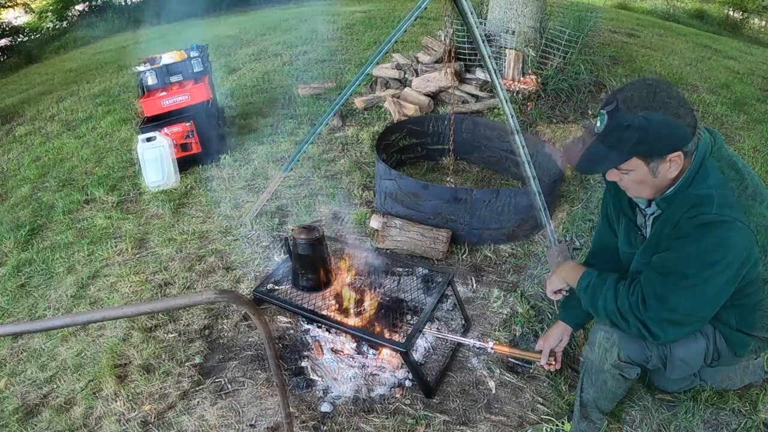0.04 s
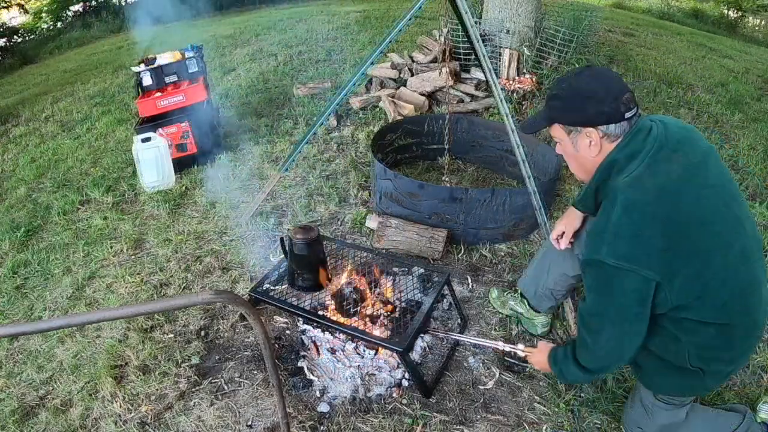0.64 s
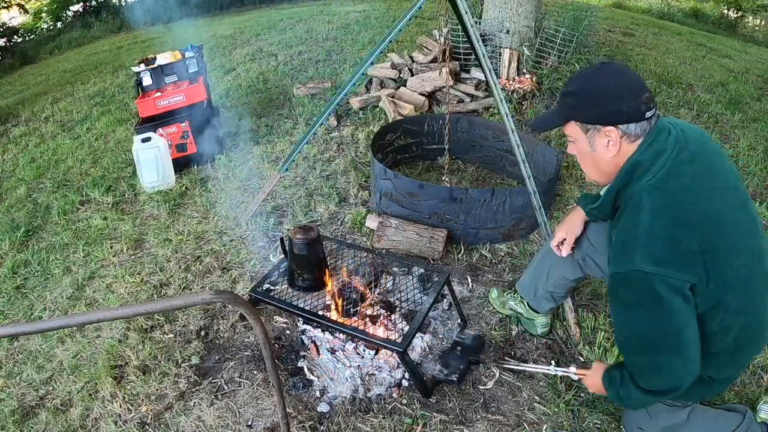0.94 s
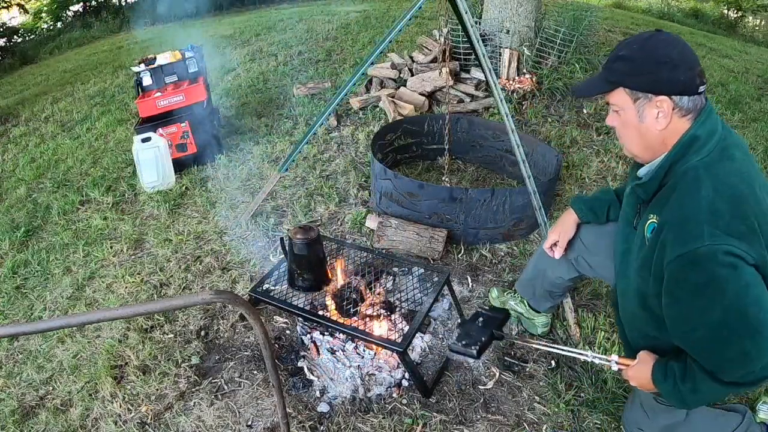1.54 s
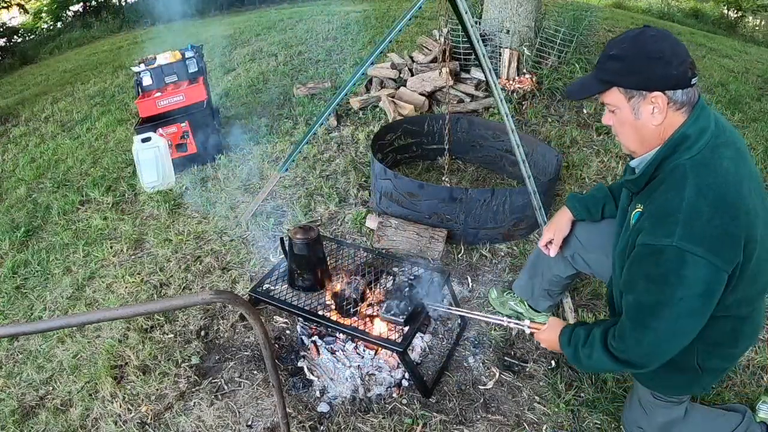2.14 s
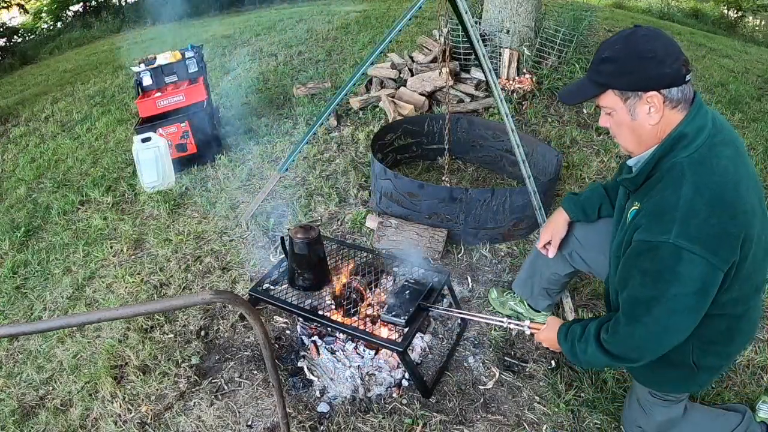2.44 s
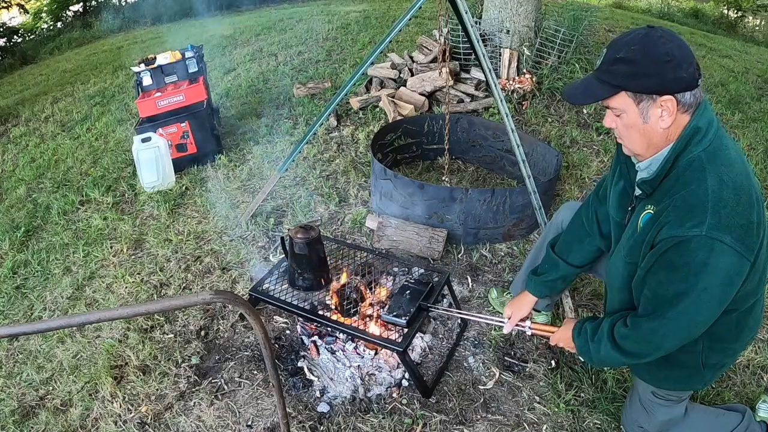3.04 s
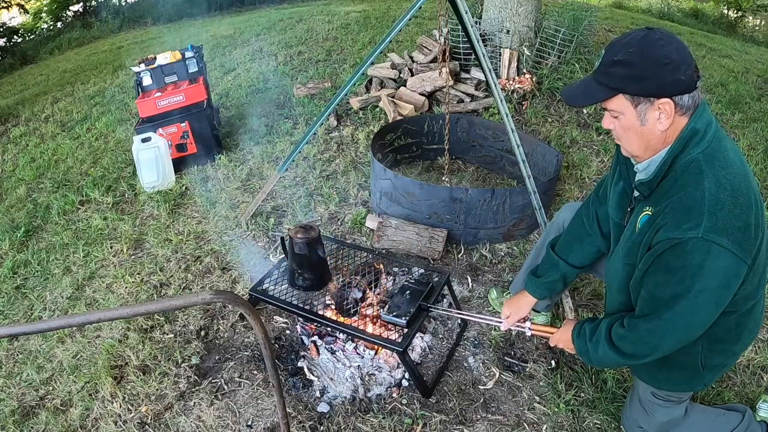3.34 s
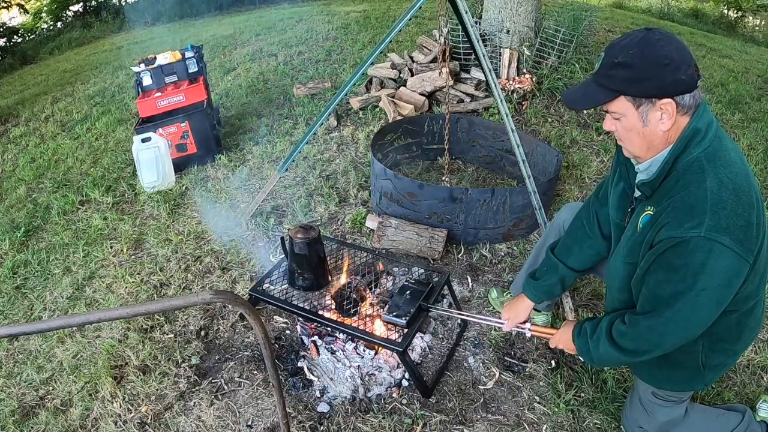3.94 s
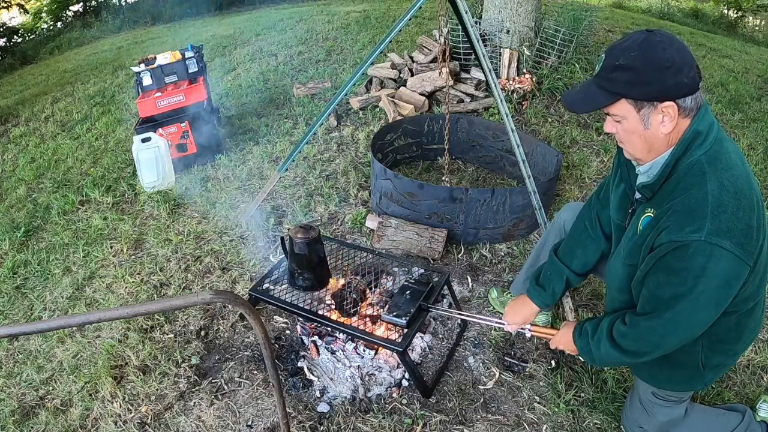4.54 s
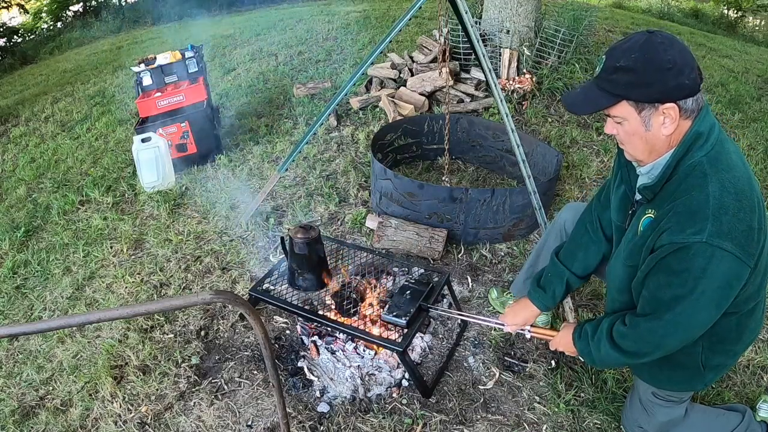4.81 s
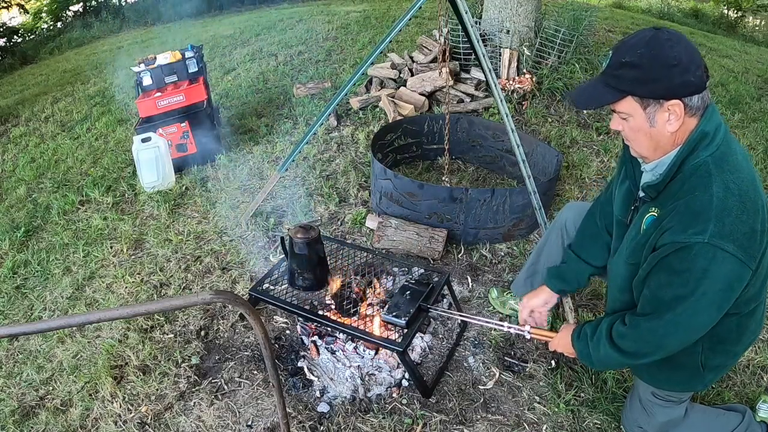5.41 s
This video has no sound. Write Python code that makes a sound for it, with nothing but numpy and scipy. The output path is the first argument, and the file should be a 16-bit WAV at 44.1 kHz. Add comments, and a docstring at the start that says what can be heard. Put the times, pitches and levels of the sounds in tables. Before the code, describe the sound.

Two short bursts of iron clanking on a steel grill over a quietly snapping campfire, with soft crickets and distant bird whistles.

```python
"""A long-handled cast-iron cooker is set down on a steel grate, rocks, and later knocks once more:
iron and grate ring, the mesh rattles, the frame thuds and the handle rods clack together.
Under it a campfire snaps with bursting gas and flutters in the breeze, and the cook's clothes rustle.
Crickets trill with their wings and a bird whistles arched notes from the trees around the lawn.
A noisy echo trails the knocks; a gain control dips the mix a little after each loud knock or snap."""
import sys
import numpy as np
from scipy import signal
from scipy.fft import rfft, irfft, next_fast_len
from scipy.io import wavfile

SR = 44100
rng = np.random.default_rng(int(sys.argv[2]) if len(sys.argv) > 2 else 0)


def unload_wav(signal):
    """Save mono or channel-first audio to the path in sys.argv[1] as 16-bit WAV at rate SR, clipped to [-1, 1]."""
    wavfile.write(
        sys.argv[1],
        SR,
        np.round(np.clip(np.atleast_2d(signal).T, -1, 1) * 32767).astype(np.int16),
    )


N = 250047
T = np.arange(N) / SR

# Stereo image of the open air. Each row: frequency in Hz, left-right likeness from 0 to 1.
AIR_LIKENESS = [(60, 0.92), (130, 0.99), (290, 0.52), (640, 0.54), (1400, 0.47), (3100, 0.57), (7000, 0.23),
                (15000, 0.13)]


def amp(db):
    """Decibels to amplitude."""
    return 10 ** (np.asarray(db) / 20)


def unit_rms(x):
    """Scales to an rms of 1."""
    return x / np.sqrt(np.mean(x ** 2) + 1e-20)


def curve_at(points, hz):
    """Reads a curve on a log-frequency axis."""
    point_hz, value = np.transpose(points)
    return np.interp(np.log(hz + 1), np.log(point_hz + 1), value)


def add(mix, start_s, sound):
    """Mixes a sound in at its start time."""
    part = mix[..., max(round(start_s * SR), 0):][..., :sound.shape[-1]]
    part += sound[..., :part.shape[-1]]


def hump(hz, centre_hz, octaves, depth_db):
    """A broad bell EQ, in dB relative to its top."""
    return depth_db * (np.exp(-.5 * (np.log2((hz + 1) / centre_hz) / octaves) ** 2) - 1)


def drift(rate_hz, size=N):
    """A smooth random wander with an rms of about 1."""
    lowpass = np.exp(-(np.fft.rfftfreq(N, 1 / SR) / rate_hz) ** 2)
    return unit_rms(irfft(rfft(rng.standard_normal(N)) * lowpass, N))[:size]


def noise(colour, likeness=AIR_LIKENESS, size=N, lag_s=2.6e-5):
    """Stereo noise whose colour maps Hz to dB; the left side lags slightly."""
    count = next_fast_len(size)
    hz = np.fft.rfftfreq(count, 1 / SR)
    common, separate = np.exp(2j * np.pi * rng.random((2, len(hz))))
    share = np.clip(curve_at(likeness, hz), 0, 1)
    left = common * np.exp(-2j * np.pi * hz * lag_s)
    right = share * common + np.sqrt(1 - share ** 2) * separate
    return unit_rms(irfft(np.array([left, right]) * amp(colour(hz)), count)[:, :size])


def scatter(x, t60, delay_s, rise_s, top_hz):
    """Darkened echoes off many surfaces build up after a delay and die away."""
    late = np.maximum(np.arange(SR) / SR - delay_s, 0)
    tail = noise(lambda hz: -10 * np.log10(1 + (hz / top_hz) ** 4), size=SR)
    tail = tail * (1 - np.exp(-late / rise_s)) * amp(-60 * late / t60)
    return signal.fftconvolve(x, tail / np.linalg.norm(tail[0]), axes=1)[:, :N]


def swells(rows, octaves, grain_db):
    """Short, grainy swells of noise, each in its own band."""
    out = np.zeros((2, N))
    for middle_s, db, centre_hz, length_s in rows:
        size = int(length_s * SR)
        band = noise(lambda hz: hump(hz, centre_hz, octaves, depth_db=55), size=2 * SR)[:, :size]
        envelope = amp(db + grain_db * drift(50, size)) * np.hanning(size)
        add(out, middle_s - length_s / 2, envelope * unit_rms(band))
    return out


def outdoors():
    """The bed: a lumpy flutter of flames and breeze under a soft hiss."""
    # Spectra of the flutter and the hiss. Each row: frequency in Hz, level in dB.
    flutter_eq = [(15, -11), (30, -10.5), (60, -1), (105, -1.5), (138, 4.5), (200, -1.5), (280, -12.5),
                  (420, -20), (900, -30)]
    hiss_eq = [(100, 4), (300, 5.5), (600, -2), (1200, 5), (2500, 1), (4500, 3.5), (8000, 0),
               (11000, -10.5), (16000, -21)]
    flutter = amp(-59.5) * noise(lambda hz: curve_at(flutter_eq, hz)) * amp(1.9 * drift(12))
    hiss = amp(-66) * noise(lambda hz: curve_at(hiss_eq, hz)) * amp(0.71 * drift(37))
    return flutter + hiss


def gusts(length_s=.11):
    """Flame and breeze buffet the microphone in low puffs."""
    # Each row: middle in seconds, level in dB, band centre in Hz.
    puffs = [(.3, -52.5, 78.5), (.76, -52.5, 96), (0.928, -65.5, 106), (1.169, -55.5, 60), (1.6, -53, 94),
             (2.55, -53, 67), (3.591, -55, 45.3), (3.93, -51.5, 62), (4.339, -65, 143), (4.991, -52, 85.5)]
    return swells([(s, db, hz, length_s) for s, db, hz in puffs], octaves=1.92, grain_db=1.1)


def crickets():
    """Far crickets blur into a band; the nearest pulse with each stroke of the wings."""
    # The far chorus. Each row: frequency in Hz, level in dB.
    chorus_eq = [(3800, -50), (4500, -16.5), (4850, -6), (5150, -3.5), (5450, -1.5), (5750, -0.5),
                 (6050, 0.5), (6500, -4.5), (7200, -11.5), (7700, -22.5), (8300, -47)]
    # Each row: pitch in Hz, level in dB, wing strokes a second.
    near_crickets = [(5790, -63, 30), (6040, -69, 36), (5720, -69, 150), (6130, -75.5, 76)]
    out = amp(-54) * noise(lambda hz: curve_at(chorus_eq, hz), lag_s=1e-5) * amp(0.75 * drift(90))
    for hz, db, rate in near_crickets:
        stroke = np.cumsum(rate * (1 + 0.0253 * drift(4.1))) / SR % 1
        tooth_hz = hz * (1 - 0.02 * (stroke - .5) + 0.00586 * drift(121))  # the wing slows in a stroke
        tone = np.exp(2j * np.pi * np.cumsum(tooth_hz) / SR)
        left = np.sin(np.pi * stroke) ** 2 * tone * amp(1.1 * drift(4.8))
        right = left * np.exp(1j * drift(21))  # wandering phase widens the image
        out += amp(db) * unit_rms(np.array([left.real, right.real]))
    return out


def insect(fade_db_per_s=42):
    """A high insect buzz swells in and out."""
    # The buzz's spectrum. Each row: frequency in Hz, level in dB.
    buzz_eq = [(7500, -45), (8500, -4.5), (9300, -1.5), (10100, -14.5), (11500, -23)]
    # Each row: crest of a swell in seconds, level in dB.
    buzzes = [(.34, -68.5), (1.8, -73), (4.55, -64.5)]
    envelope = sum(amp(db - fade_db_per_s * abs(T - s)) for s, db in buzzes)
    return envelope * noise(lambda hz: curve_at(buzz_eq, hz))


def whistle(contour, notes, waver):
    """A pure tone slides along a note's contour, a little differently each time."""
    out = np.zeros(N)
    when, pitch_hz, level_db = np.transpose(contour)
    t = np.arange(0, when[-1], 1 / SR)
    for start_s, db in notes:
        hz = np.interp(t, when, pitch_hz) * (1 + waver * drift(170, len(t)))
        envelope = amp(db + np.interp(t, when, level_db) + 2.9 * drift(70, len(t)))
        envelope *= signal.windows.tukey(len(t), .1)
        add(out, start_s, envelope * np.sin(2 * np.pi * np.cumsum(hz) / SR))
    return np.array([out, out])


def bird(flick_delay_s=.19):
    """Whistled arches, each long one answered by a high flick; the leaves scatter the flicks most."""
    # Note contours. Each row: seconds into the note, pitch in Hz, relative level in dB.
    long_arch = [(0, 1750, -11), (.025, 1950, -7), (.04, 2110, -15), (.055, 2210, 1), (.095, 2433, -5),
                 (.115, 2235, -0.5), (.135, 1890, -6), (.152, 1770, -3.5), (.168, 1780, -8)]
    short_arch = [(0, 1700, 3.5), (.02, 1880, 6.5), (.033, 2107, -7), (.047, 2180, 5), (.062, 1876, 1.5),
                  (.078, 1637, 1), (.092, 1500, 0)]
    flick = [(0, 3203, 3.5), (.03, 3275, -10.5), (.05, 3330, -15), (.06, 3547, 3), (.09, 3700, -5),
             (.12, 3640, -28)]
    # The song. Each row: start in seconds, relative level in dB.
    long_notes = [(3.54, -64.5), (4.097, -54), (4.482, -49), (4.838, -46.5)]
    short_notes = [(5.217, -55.5), (5.513, -57.5)]
    flick_notes = [(s + flick_delay_s, -38 + 0.39 * db) for s, db in long_notes]
    low = whistle(long_arch, long_notes, waver=.014) + whistle(short_arch, short_notes, waver=.011)
    high = whistle(flick, flick_notes, waver=.024)
    send = amp(-7) * low + amp(-0.5) * high
    leaves = scatter(send, t60=0.57, delay_s=0.005, rise_s=0.0087, top_hz=7360)
    return amp(-3.5) * low + amp(-11) * high + leaves


def rustles():
    """Soft rustles of clothes and handles."""
    # Each row: middle in seconds, level in dB, band centre in Hz, length in seconds.
    washes = [(.581, -61.5, 4300, 0.32), (.871, -68, 520, .55), (1.05, -67, 2180, 1.1),
              (1.6, -68.5, 2000, 0.46), (2.444, -56.5, 8000, 0.082), (2.72, -61, 2350, .65),
              (3.021, -54.5, 212, 0.11), (3.15, -72, 544, .65), (4.981, -68.5, 460, 0.18),
              (5.18, -50, 5030, 0.19), (5.22, -62, 583, 0.32), (5.46, -54, 3730, 0.22)]
    return swells(washes, octaves=1.69, grain_db=2.0)


def click(colour, size):
    """A sharp minimum-phase pulse of energy 1, one sample later on the left."""
    log_gain = np.log(amp(colour(abs(np.fft.fftfreq(size, 1 / SR)))))
    pulse = np.fft.ifft(np.exp(signal.hilbert(log_gain).conj())).real
    return np.array([np.roll(pulse, 1), pulse]) / np.linalg.norm(pulse)


def fire(fizz_t60=0.024):
    """Gas pockets burst in the wood, a crack and a fizz each: clear snaps among faint ticks."""
    # Each row: start in seconds, crack level in dB, band centre in Hz.
    snaps = [(0.0715, -6.5, 3830), (.624, -37, 3400), (1.483, -46, 9000), (1.504, -47, 2500),
             (1.833, -43, 9000), (2.0644, -27.5, 7740), (3.621, -26.5, 6500), (3.723, -37, 6500),
             (3.863, -36.5, 3700), (5.323, -29, 3610)]
    # The spectrum of snapping wood. Each row: frequency in Hz, level in dB.
    wood_eq = [(150, -20), (650, -4), (1300, 2.5), (1900, -15), (2300, -12), (2900, -2), (4100, 0.5),
               (6500, -0.5), (8200, -7.5), (10000, -7), (16000, -33)]
    ticks = [(when * N / SR, -63 + 14 * size ** 2, 2500 + 5000 * pitch)
             for when, size, pitch in rng.random((24, 3))]
    out, t = np.zeros((2, N)), np.arange(4096) / SR
    for start_s, db, centre_hz in snaps + ticks:
        colour = lambda hz: curve_at(wood_eq, hz) + hump(hz, centre_hz, octaves=1.29, depth_db=18.5)
        fizz = amp(-29 + 0.46 * db - 60 * t / fizz_t60) * noise(colour, size=len(t))
        add(out, start_s, amp(db) * click(colour, len(t)) + fizz)
    return out


def ring(modes, contact_hz, sustain, t):
    """A struck body's modes build up in about a cycle and die away; the contact favours one band."""
    hz, db, t60 = np.transpose(modes)[:, :, None]
    phase, skew = rng.random(hz.shape), rng.standard_normal(hz.shape)
    weights = amp(db + hump(hz, contact_hz, octaves=0.67, depth_db=12.5))
    right_lead = hz * 3.2e-5 * (1 + 0.21 * skew)
    cycles = hz * t + np.array([phase, phase + right_lead])
    envelopes = weights * amp(-60 * t / (sustain * t60)) * (1 - np.exp(-t * hz / 0.28))
    return (envelopes * np.sin(2 * np.pi * cycles)).sum(1) / np.linalg.norm(weights)


def cooker_on_grate(rattle_t60=0.11, clack_s=5.1052):
    """Each blow rings iron and grate, rattles the mesh and thuds the frame; the rods clack once."""
    # Each row: start in seconds, iron, grate and rattle levels in dB, the contact's band in Hz.
    blows = [(2.2665, -47, -53, -29.5, 3020), (2.2793, -26, -25, -23, 1780),
             (2.2927, -18.5, -26.5, -19.5, 4170), (2.2975, -25, -25, -27.5, 1290),
             (2.3041, -31, -19, -25, 3900), (2.3555, -43, -34, -32.5, 1000), (2.3647, -39, -41, -35, 3180),
             (2.3708, -42, -22.5, -43, 1330), (2.3745, -21, -43, -48, 1900),
             (2.4048, -24, -24.5, -42, 4000), (2.408, -39, -31.5, -38.5, 1030),
             (5.1053, -32, -32, -24, 4900), (5.1115, -24.5, -27.5, -21.5, 980),
             (5.1183, -15, -22.5, -20, 3970)]
    # The iron settles and is damped. Each row: time in seconds, damping from then on in dB a second,
    # factor on the decay times of the blows leading up to it.
    rests = [(2.42, 280, 1.22), (5.145, 40, 0.73)]
    # The ringing bodies. Each row: frequency in Hz, relative level in dB, base t60 in seconds.
    iron_modes = [(1830, -9, .058), (2116, 4, .12), (2219, -7.5, .1), (3258, -9, .14), (3990, -6, .1),
                  (4040, 1.5, .085), (4347, -13, .34), (5760, -12, .11), (5548, -6, .12), (6115, -15, .078),
                  (8170, -11, .07)]
    grate_modes = [(885, -3, .11), (946, -4, .08), (1110, 0, .07), (1218, 1.5, .12), (1430, -9, .045),
                   (2410, -5.5, .115), (2705, -6, .1), (2840, -4, .09), (2984, -2, .08), (3120, 2.5, .12),
                   (3880, -7, .07), (4470, -12, .09), (6600, -7, .027)]
    frame_modes = [(168, -4, .046), (228, 2.5, .05), (306, -10, .15), (430, -11, .07), (735, -14, .058)]
    rod_modes = [(2623, -5, 0.043), (2660, -2, 0.026), (3236, -5.5, 0.053)]
    # The mesh's dense rattle. Each row: frequency in Hz, level in dB.
    rattle_eq = [(50, -24), (130, -21), (220, 1.5), (400, -4.5), (550, -4), (780, -6), (1000, 2),
                 (1550, -5), (2000, -0.5), (2700, -2.5), (4200, -2.5), (6000, -7), (7500, -11.5),
                 (10000, -22), (16000, -40)]
    # Its stereo image. Each row: frequency in Hz, left-right likeness from 0 to 1.
    rattle_likeness = [(100, 1), (700, 0.96), (1400, 0.88), (3100, 0.87), (7000, 0.18), (15000, 0.78)]
    out, t = np.zeros((2, N)), np.arange(SR // 3) / SR
    for start_s, iron_db, grate_db, rattle_db, contact_hz in blows:
        rest_s, damping, sustain = next(row for row in rests if row[0] > start_s)
        rings = amp(iron_db) * ring(iron_modes, contact_hz, sustain, t)
        rings += amp(grate_db) * ring(grate_modes, contact_hz, sustain, t)
        rings *= amp(-damping * np.maximum(start_s + t - rest_s, 0))
        thud_db = 11.5 + 1.655 * grate_db  # only hard blows reach the legs
        thud = amp(thud_db) * ring(frame_modes, contact_hz, sustain, t)
        colour = lambda hz: curve_at(rattle_eq, hz) + hump(hz, contact_hz, octaves=0.9, depth_db=7.0)
        rattle = noise(colour, rattle_likeness, size=len(t))
        rattle *= amp(rattle_db - 60 * t / (sustain * rattle_t60)) * (1 - np.exp(-t / 0.00035))
        add(out, start_s, rings + thud + rattle)
    add(out, clack_s, amp(-13) * ring(rod_modes, contact_hz=2800, sustain=1, t=t))
    return out


def scene():
    """Knocks and snaps scatter off the ground and fire ring; the knocks return faintly from the trees."""
    knocks = cooker_on_grate() * amp([[-.4], [.4]])  # a touch to the right
    snaps = fire()
    send = amp(-19) * knocks + amp(-23) * snaps
    ground = scatter(send, t60=.17, delay_s=.0015, rise_s=.003, top_hz=8000)
    trees = scatter(amp(-44) * knocks, t60=1.0, delay_s=.09, rise_s=.25, top_hz=3500)
    background = rustles() + gusts() + bird() + crickets() + insect() + outdoors()
    return background + ground + trees + snaps + knocks


def record(dry):
    """Gain control ducks after each loud peak and creeps back; a low-pass trims the very top."""
    threshold_db, duck_db_per_db, attack_s, release_db_per_s = -27.5, .13, 0.049, 1.53
    over_db = np.maximum(20 * np.log10(abs(dry).max(0) + 1e-9) - threshold_db, 0)
    release_db = release_db_per_s * T
    held_db = np.maximum.accumulate(duck_db_per_db * over_db + release_db) - release_db
    pole = np.exp(-1 / (attack_s * SR))
    ducked = dry * amp(-signal.lfilter([1 - pole], [1, -pole], held_db))
    lowpass = signal.firwin(511, cutoff=15900, window=("kaiser", 9), fs=SR)
    return signal.oaconvolve(ducked, lowpass[None], "same")


dry = scene()
out = record(dry)
unload_wav(out)
```